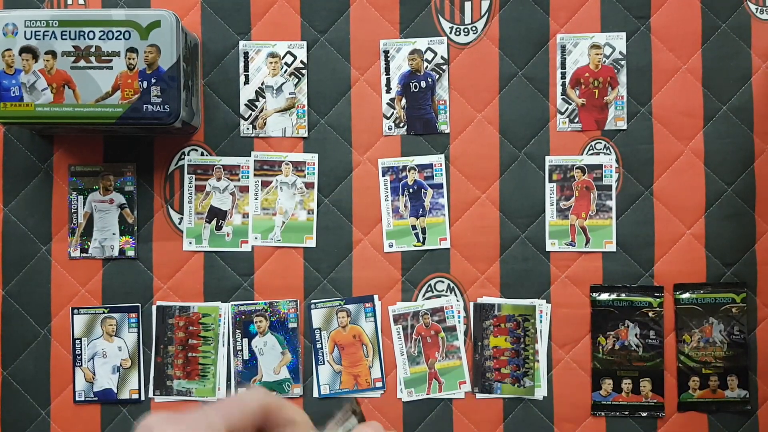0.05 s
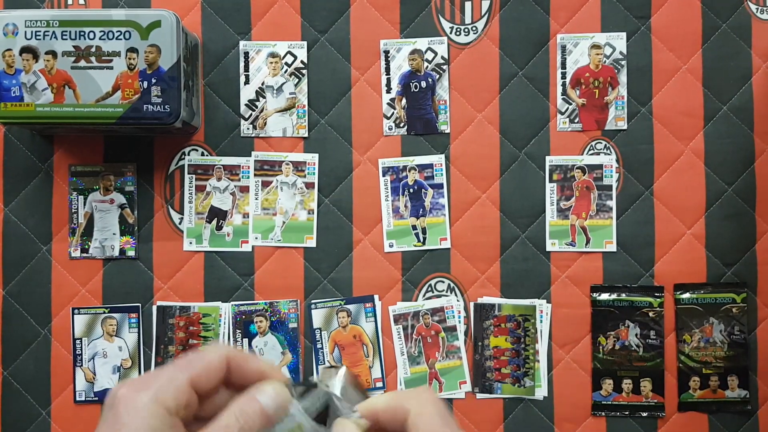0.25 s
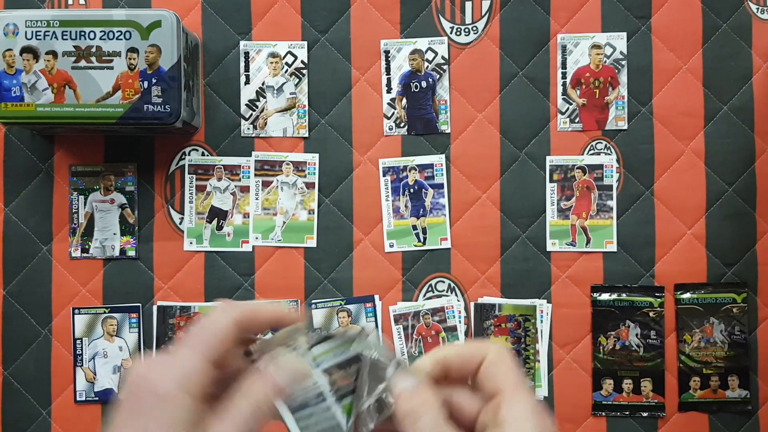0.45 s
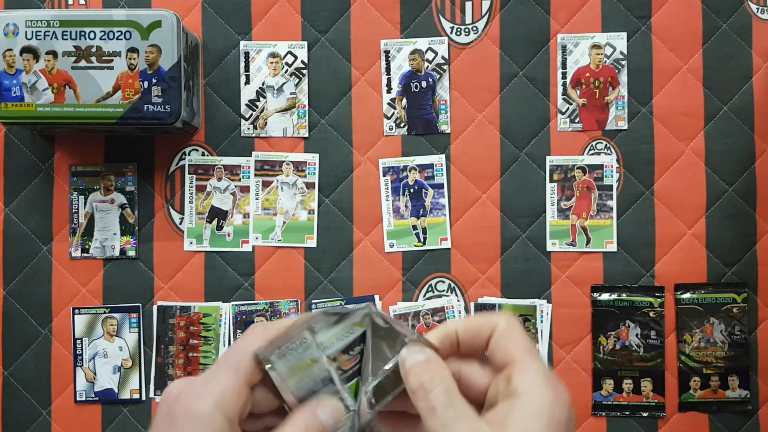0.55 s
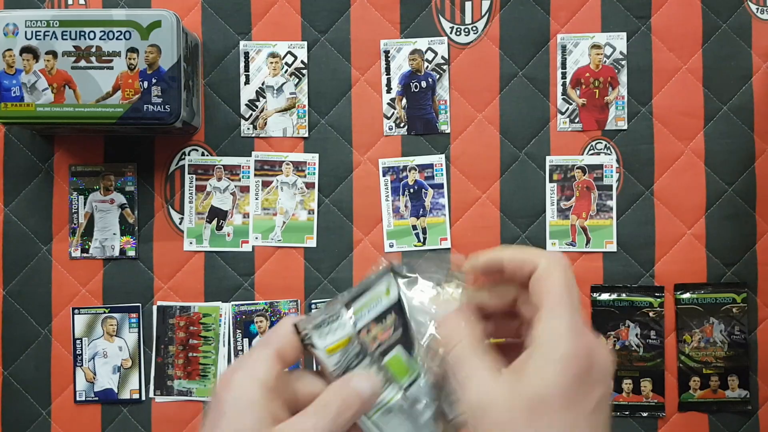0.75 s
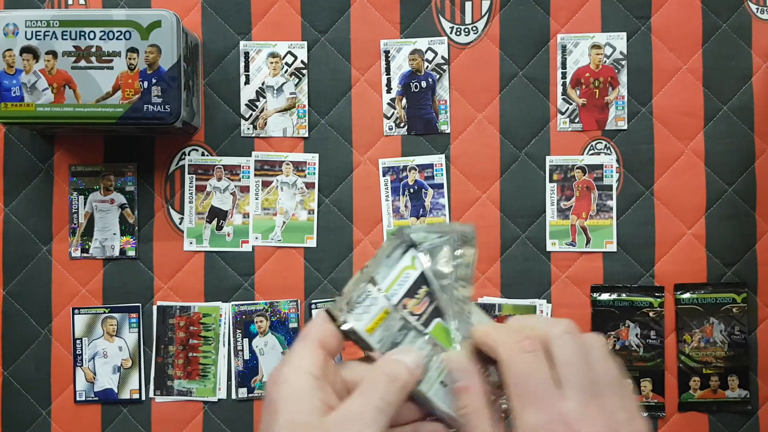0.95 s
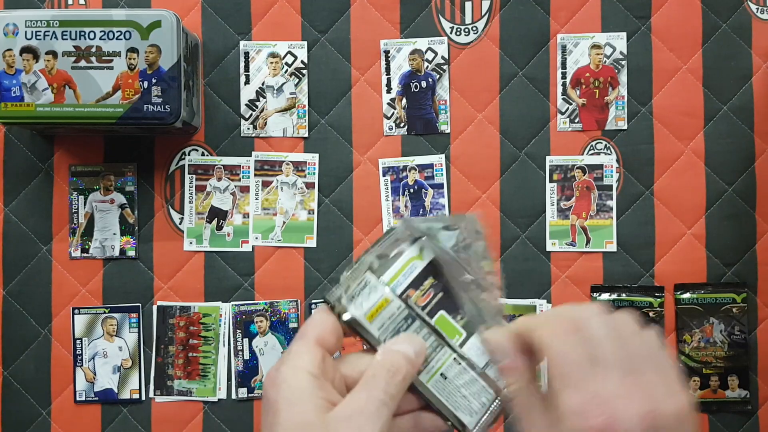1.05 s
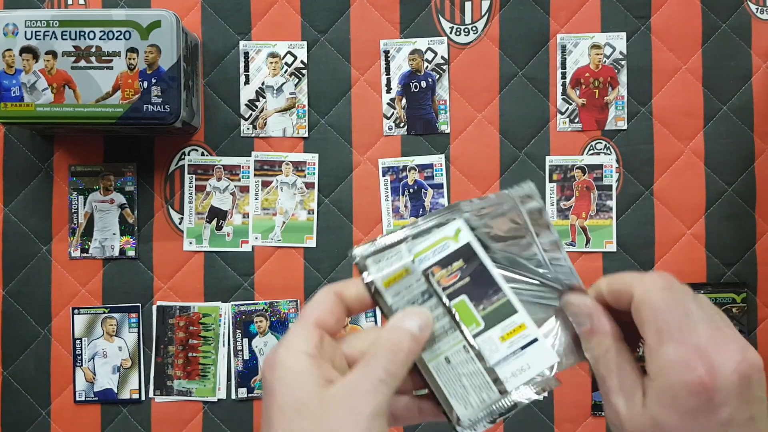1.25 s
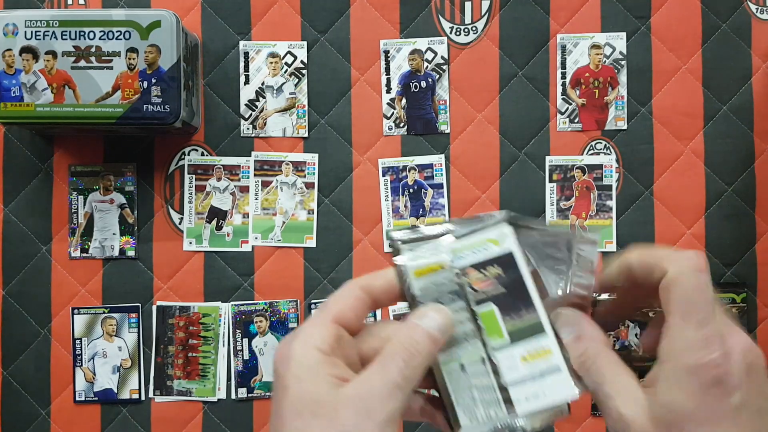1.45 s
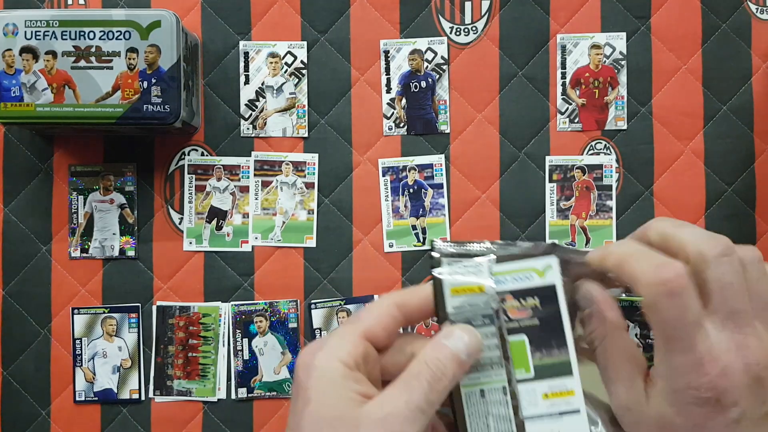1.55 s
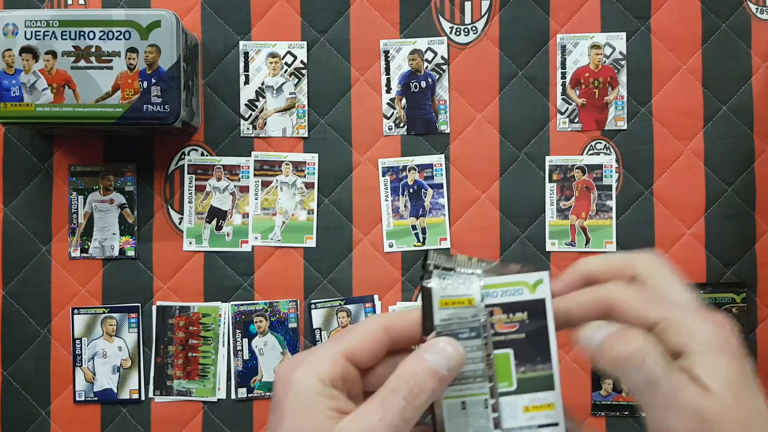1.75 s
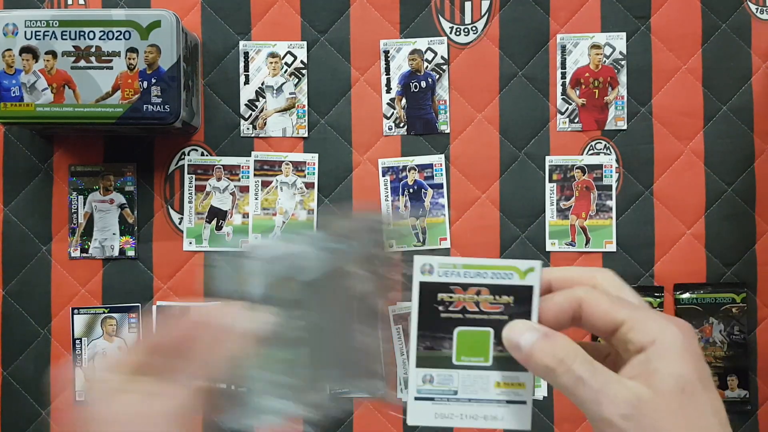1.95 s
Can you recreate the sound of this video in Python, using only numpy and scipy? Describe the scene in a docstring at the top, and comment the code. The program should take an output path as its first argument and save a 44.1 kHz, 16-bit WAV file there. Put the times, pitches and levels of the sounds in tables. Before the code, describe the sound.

A plastic foil packet crinkles faintly in the hands, close by in a small room. At about 0.2 seconds its seam gives with a bright snap on the left and a short rip. Uneven crinkles and sharp little pops follow as it is peeled open, loudest from 1.2 to 1.6 seconds, with a few soft thumps of the flexing wrapper. The crackling thins out toward 2 seconds.

```python
"""A faint crinkle, then one bright snap and a short rip: two hands tear open a plastic foil packet, close
by in a small room, and peel it off the cards. Each pull crinkles the foil in a shower of tiny creases.
Single creases pop over with a crack, a papery knock and a low flap, and now and then the whole sheet
bows with a soft thump. The room rings on after them, over a faint rumble and hiss."""
import sys
import numpy as np
from scipy import signal
from scipy.io import wavfile
from scipy.ndimage import uniform_filter1d

SR = 44100
rng = np.random.default_rng(int(sys.argv[2]) if len(sys.argv) > 2 else 0)


def dump(signal):
    """Clip the signal to [-1, 1] and save it as 16-bit WAV at the path in sys.argv[1]."""
    limited = np.clip(np.atleast_2d(signal).T, -1, 1)
    pcm = np.round(limited * 32767).astype(np.int16)
    wavfile.write(sys.argv[1], SR, pcm)


N = 88200
TIME = np.arange(N) / SR

# Single creases popping over. Each row: start in seconds, flap, knock and crack levels in dB before
# the voice's trim, knock pitch in Hz, crack pitch in Hz.
POPS = [(.0574, -67, -53, -40.5, 2020, 9100), (.167, -63, -70, -49, 2000, 9200),
        (0.179, -60, -41, -45, 2640, 7060), (0.1993, -77, -33.5, -32, 2650, 4050),
        (0.2207, -49.5, -51, -27.5, 1177, 10500), (0.2259, -61, -41, -33, 2430, 4460),
        (0.2686, -53, -38, -40, 1110, 6500), (0.3792, -51, -43.5, -44, 2500, 7940),
        (0.4036, -70, -60, -41.5, 2400, 7850), (0.446, -61, -36, -38.5, 2620, 7100),
        (.4673, -53, -47, -48, 2200, 4950), (0.4826, -56, -39, -53, 2000, 5000),
        (.5037, -47, -52, -34, 2000, 9900), (0.525, -47, -36.5, -37, 1500, 12000),
        (0.571, -56, -45.5, -36.5, 2600, 4640), (.6105, -45, -37.5, -43.5, 1320, 4370),
        (0.6363, -70, -45.5, -45.5, 1500, 5500), (.6863, -37.5, -43.5, -34, 1590, 11500),
        (0.7177, -47, -46.5, -33.5, 1800, 12700), (.726, -61, -51, -32.5, 1600, 10900),
        (.743, -46.5, -46, -71, 1470, 5000), (0.7577, -51, -46, -31.5, 2500, 10000),
        (0.7645, -61, -38, -29.5, 2060, 6450), (0.7835, -50, -38, -30, 2000, 12500),
        (0.7882, -57, -42, -33, 2400, 6060), (.8, -51, -34, -32.5, 850, 8100),
        (0.9048, -50, -42.5, -40.5, 2550, 6300), (.9795, -66, -56, -50.5, 2000, 10900),
        (1.0132, -42, -41, -40.5, 2220, 7500), (1.022, -42.5, -43.5, -61, 1600, 4500),
        (1.0448, -58, -39.5, -39.5, 1800, 7200), (1.083, -48.5, -51, -45, 1490, 7000),
        (1.1156, -56, -40, -40, 1600, 12000), (1.1363, -71, -48, -30.5, 2000, 9000),
        (1.167, -65, -36.5, -50, 1680, 5000), (1.176, -41, -36.5, -46, 1260, 6000),
        (1.1896, -60, -41, -31.5, 2800, 6040), (1.2431, -37.5, -26.5, -39, 2120, 7050),
        (1.2518, -44, -40, -30, 2500, 12000), (1.2626, -29.5, -27.5, -31.5, 1600, 7900),
        (1.275, -37, -29, -46, 1880, 4530), (1.2859, -44, -42, -27, 1900, 9900),
        (1.2908, -30, -20, -30, 1680, 11000), (1.3017, -39, -22.5, -31, 1800, 4770),
        (1.3356, -26.5, -26, -31, 1430, 4950), (1.3398, -37, -31, -40, 1460, 4470),
        (1.4127, -43, -32.5, -33.5, 1090, 8400), (1.4286, -48, -38, -43, 1780, 4570),
        (1.4363, -41, -36, -38.5, 1010, 5000), (1.531, -32, -27.5, -33, 2380, 6660),
        (1.5415, -42, -33, -44, 2500, 5960), (1.5536, -56, -36.5, -39.5, 2200, 6400),
        (1.5819, -44.5, -43, -44, 1900, 7000), (1.5993, -39, -31.5, -42.5, 2150, 5460),
        (1.7132, -53, -37, -49, 1980, 4560), (1.7592, -61, -44, -45.5, 2500, 11000),
        (1.741, -53.5, -63, -48, 2010, 7960), (1.899, -60, -53.5, -66, 2090, 4500),
        (1.978, -53.5, -38.5, -41.5, 1920, 7900), (1.9927, -53, -45, -47, 1680, 5000)]
# Pulls of the hands. Each row: start and length in seconds, flap, knock and crack levels in dB before trim.
PULLS = [(0.014, 0.061, -64, -57, -59), (0.164, 0.025, -72, -59, -49), (0.364, 0.067, -66, -49.5, -51.5),
         (0.459, 0.086, -58.5, -43.5, -42), (0.512, 0.069, -53.5, -40, -48.5),
         (0.602, 0.14, -52.5, -46.5, -53), (0.746, 0.07, -46, -38.5, -44), (0.825, 0.079, -50, -44, -49.5),
         (0.999, 0.1, -52, -46.5, -50.5), (1.111, 0.11, -55, -42, -45), (1.239, 0.103, -40.5, -33.5, -41),
         (1.408, 0.061, -47.5, -45, -51.5), (1.522, 0.088, -51.5, -46.5, -49),
         (1.629, 0.18, -60.5, -53, -59.5), (1.894, 0.13, -59, -56.5, -64.5)]
# The foil's voices: low flap, papery knock, bright crack. Each row: frequency in Hz, relative level in dB.
FLAP_EQ = [(20, -33), (60, -19.5), (130, -12), (230, -1.5), (320, 2), (470, 1.5), (620, -12.5), (850, -4.5),
           (1300, -32), (4000, -60)]
KNOCK_EQ = [(100, -36.5), (400, -15), (620, -10), (850, 0.5), (1150, -4), (1650, -1), (2300, 0.5),
            (2900, -1), (3600, -12), (9000, -25), (17000, -69)]
CRACK_EQ = [(200, -43), (1500, -4.5), (3000, 1.5), (4500, 2), (7500, 2), (8800, -4.5), (12000, 0),
            (16000, -6)]
# Flap, knock and crack in turn. Each row: chatter decay in seconds, click gain over the chatter,
# pop trim in dB, pull trim in dB, left-right likeness, pan to the left in dB.
VOICES = [(0.0026, 0.65, -1.5, -4, 0.85, 0), (0.00098, 0.72, 1, -3, 0.79, 1.5),
          (0.0013, 0.43, -0.5, 1.5, 0.59, 8)]
FLAP_HZ, PULL_SWELL_DB = 366, 2.5
PULL_ATTACK_S, PULL_RELEASE_S = 0.0094, 0.0064
POP_LEAD_S, RIGHT_LAG_S = 0.002, 0.00019
POP_GAIN = np.sqrt(0.005 * SR)  # gives a pop the energy of 5 ms at unit power

def foil():
    """Showers of tiny creases and single pops excite the flap, knock and crack of the sheet."""
    out = np.zeros((2, N))
    wobble = np.sqrt(N) * unit(uniform_filter1d(rng.standard_normal(N), size=400))
    swell = amp(PULL_SWELL_DB * wobble)
    for k, eq in enumerate([FLAP_EQ, KNOCK_EQ, CRACK_EQ]):
        chatter_s, click, pop_trim_db, pull_trim_db, likeness, pan_db = VOICES[k]
        effort = np.zeros(N)
        for start, length, *levels_db in PULLS:
            attack = np.clip((TIME - start) / PULL_ATTACK_S, 0, 1)
            release = np.exp(-np.maximum(TIME - start - length, 0) / PULL_RELEASE_S)
            effort = np.maximum(effort, amp(levels_db[k] + pull_trim_db) * attack * release)
        clicks = effort * swell * shower(rate_per_s=1100, spread_db=3.5)
        voice = crinkle(clicks, eq, chatter_s, click, likeness)
        for start, *levels_db, knock_hz, crack_hz in POPS:
            pitch_hz = (FLAP_HZ, knock_hz, crack_hz)[k]
            pop = unit(colour(snap(chatter_s, click, likeness), crease_eq(eq, pitch_hz)))
            add(voice, start - POP_LEAD_S, amp(levels_db[k] + pop_trim_db) * POP_GAIN * pop)
        out += pan(pan_db) * voice
    return out

def snap(chatter_s, click, likeness, rise_s=0.00066, lag_scatter_s=0.00006, size=700):
    """A crease stirs, clicks over and chatters briefly; the right side hears it a touch later."""
    t = TIME[:size] - POP_LEAD_S
    chatter = rng.standard_normal((2, size)) * np.sqrt(rng.exponential(1, size))
    envelope = np.exp(-np.maximum(t / chatter_s, -t / rise_s))
    burst = unit(stereo(chatter, likeness) * envelope)
    burst[:, round(POP_LEAD_S * SR)] += click
    lag = max(round((RIGHT_LAG_S + lag_scatter_s * rng.standard_normal()) * SR), 0)
    burst[1] = np.pad(burst[1], (lag, 0))[:size]
    return unit(burst) * POP_GAIN

def shower(rate_per_s, spread_db):
    """Random clicks of very unequal strength, levelled to a mean power near one."""
    hits = rng.random(N) < rate_per_s / SR
    strength = amp(spread_db * np.minimum(rng.exponential(1, N), 4))
    clicks = hits * strength * rng.choice([-1., 1.], N)
    power = abs(uniform_filter1d(clicks ** 2, size=1500))
    return clicks / np.sqrt(power + 1e-4)

def crinkle(clicks, eq, chatter_s, click, likeness, count=10):
    """Each click triggers one of several creases, from large and dull to small and bright."""
    which, out = rng.integers(0, count, N), np.zeros((2, N))
    for k, hz in enumerate(np.geomspace(eq[2][0], eq[-2][0], count)):
        crease = unit(colour(snap(chatter_s, click, likeness), crease_eq(eq, hz)))
        out += signal.oaconvolve((clicks * (which == k))[None], crease)[:, :N]
    return out

def crease_eq(eq, pitch_hz, peak_db=7.5, width_octaves=0.57):
    """A crease's size puts a peak of its own on the foil's voice."""
    hz = np.geomspace(20, SR / 2, 120)
    bell = np.exp(-(np.log2(hz / pitch_hz) / width_octaves) ** 2)
    return np.transpose([hz, curve(eq, hz) + peak_db * bell])

# The tone of the seam's snap. Each row: frequency in Hz, relative level in dB.
SEAM_EQ = [(30, -18), (130, -1), (400, -4), (1100, -1), (2000, -22), (5000, -4), (7500, -7), (10000, 4.5),
           (16000, -1.5)]
SEAM_AT_S = 0.2119

def seam_snap():
    """The seam gives with one bright snap, hard left."""
    crack = np.zeros((2, N))
    add(crack, SEAM_AT_S - POP_LEAD_S, amp(-21) * snap(chatter_s=0.0002, click=4.0, likeness=0.6))
    return pan(left_db=30) * colour(crack, SEAM_EQ)

# The rasp of the rip. Each row: frequency in Hz, relative level in dB.
RIP_EQ = [(60, -35), (300, -6), (600, -6), (1000, -2), (2500, 4.5), (5000, 3), (7500, 4), (9000, -0.5),
          (16000, -9)]

def rip(hold_s=0.0079, decay_s=0.047):
    """The rip runs on from the snap as a dense, dying train of tiny breaks."""
    envelope = (TIME > SEAM_AT_S) * np.exp(-np.maximum(TIME - SEAM_AT_S - hold_s, 0) / decay_s)
    breaks = amp(-30.5) * envelope * shower(rate_per_s=1300, spread_db=4)
    return pan(left_db=2) * crinkle(breaks, RIP_EQ, chatter_s=0.00098, click=0.16, likeness=0.12)

# Soft thumps of the whole sheet. Each row: start in seconds, opening pitch in Hz, level in dB.
BOWS = [(.609, 450, -36.5), (1.02, 302, -40.5), (1.079, 272, -45), (1.262, 122, -60), (1.335, 130, -50.5),
        (1.337, 380, -34.5), (1.414, 390, -27), (1.438, 320, -36.5), (1.454, 252, -43), (1.467, 181, -44),
        (1.599, 111, -53.5)]

def sheet_bows(rise_cycles=0.5, sag_per_s=11.3):
    """The slack sheet bows and swings for a few cycles, its pitch sagging."""
    out, t = np.zeros((2, N)), TIME[:SR // 20]
    for start, hz, db in BOWS:
        cycles = np.cumsum(hz * np.exp(-sag_per_s * t)) / SR
        envelope = cycles / rise_cycles * np.exp(1 - cycles / rise_cycles)
        add(out, start, amp(db) * (envelope * np.sin(2 * np.pi * cycles))[None])
    return out

# The length of the reverb tail. Each row: frequency in Hz, seconds to fall 60 dB.
TAIL_T60 = [(250, 0.19), (700, 0.49), (1800, 0.3), (5000, 0.3), (9000, 0.34), (16000, 0.28)]
# The tone of the tail. Each row: frequency in Hz, relative level in dB.
TAIL_EQ = [(50, -10), (200, 0), (400, 5), (1000, 1.5), (3000, 4.5), (7500, 3.5), (9000, -8.5), (16000, 6.5)]
# Centred lows, wide highs. Each row: frequency in Hz, left-right likeness from 0 to 1.
TAIL_LIKENESS = [(100, 0.81), (300, 1), (700, 0.7), (1400, 0), (3000, 0)]
# Early reflections. Each row: delay in seconds, gain.
ECHOES = [(.0022, 0.057), (.0076, 0.069), (0.014, 0.05)]
# Narrow resonances of the surroundings. Each row: pitch in Hz, gain in dB, seconds to fall 60 dB.
RESONANCES = [(302, -10, 0.14), (373.3, -8, 0.14), (416, -4, 0.54), (940, -3.5, 0.17), (1431, -2.5, 0.083),
              (1542, 0.5, 0.13), (1592, 0, 0.11), (2130, -3, 0.11)]

def room_response(tail_db=-8.5, fade_in_s=0.0014):
    """The room answers a click with a diffuse tail, early echoes and a few ringing notes."""
    t = TIME[:SR // 2]
    hz, when, bands = signal.stft(rng.standard_normal((2, len(t))), SR, nperseg=256)
    hz = hz[:, None]
    decay = amp(curve(TAIL_EQ, hz) - 60 * when / curve(TAIL_T60, hz))
    bands = stereo(bands, curve(TAIL_LIKENESS, hz)) * decay
    tail = signal.istft(bands, SR, nperseg=256)[1][:, :len(t)]
    response = amp(tail_db) * unit(tail * np.clip(t / fade_in_s - 0.5, 0, 1))
    for delay_s, gain in ECHOES:
        response[[0, 1], round(delay_s * SR) + rng.integers(0, 20, 2)] += gain
    stereo_t = t - np.array([[0], [RIGHT_LAG_S]])
    for ring_hz, db, t60 in RESONANCES:
        damping = np.log(1000) / t60
        ring = np.exp(-damping * t) * np.cos(2 * np.pi * ring_hz * stereo_t)
        response += amp(db) * 2 * damping / SR * ring
    return response

def room(send, cycle_hz=2.478, count=4):
    """The moving packet stirs one echo pattern after another, crossfading in a loop."""
    place = TIME * cycle_hz * count
    out = np.zeros((2, N))
    for k in range(count):
        distance = abs((place - k) % count - count / 2)
        fade = np.cos(np.pi / 2 * np.minimum(distance, 1))
        out += signal.fftconvolve(send[:1] * fade, room_response(), axes=1)[:, :N]
    return out

# The bed of room tone. Each row: frequency in Hz, relative level in dB.
ROOM_TONE_EQ = [(20, -9.5), (55, -1.5), (120, -1), (300, -4.5), (600, -13), (2000, -9.5), (6000, -16),
                (16000, -32)]

def room_tone():
    """Faint steady rumble and hiss."""
    return amp(-61) * colour(stereo(rng.standard_normal((2, N)), likeness=0.53), ROOM_TONE_EQ)

def amp(db):
    """Decibels to gain."""
    return 10 ** (np.asarray(db) / 20)

def curve(points, hz):
    """Reads a table along a logarithmic frequency axis."""
    points_hz, values = np.transpose(points)
    return np.interp(np.log(hz + 1), np.log(points_hz + 1), values)

def unit(x):
    """Scales each channel to energy one."""
    return x / np.sqrt(np.sum(x ** 2, -1, keepdims=True) + 1e-20)

def add(mix, start_s, sound):
    """Drops a sound into the mix."""
    part = mix[:, max(round(start_s * SR), 0):][:, :sound.shape[1]]
    part += sound[:, :part.shape[1]]

def colour(x, eq, size=4096):
    """Minimum-phase EQ: it rings only after each click."""
    log_gain = np.log(amp(curve(eq, abs(np.fft.fftfreq(size, 1 / SR)))))
    ring = np.fft.ifft(np.exp(np.conj(signal.hilbert(log_gain)))).real[:size // 2]
    return signal.oaconvolve(x, unit(ring)[None])[:, :N]

def pan(left_db):
    """Constant-power gains, the left side left_db above the right."""
    return np.sqrt(2) * unit(amp([left_db / 2, -left_db / 2]))[:, None]

def stereo(noise, likeness):
    """Blends two noises into a pair: likeness 0 is wide, 1 is mono."""
    likeness = np.clip(likeness, -1, 1)
    return np.array([noise[0], likeness * noise[0] + np.sqrt(1 - likeness ** 2) * noise[1]])

def scene():
    """The packet up close, with the room behind it."""
    packet = foil() + sheet_bows() + rip()
    seam = seam_snap()
    send = packet + amp(-6) * seam  # the snap points at the listener, so it stirs the room less
    return packet + seam + pan(left_db=-0.2) * room(send) + room_tone()

def record(dry, cutoff_hz=16500):
    """A steep low-pass takes off the very top."""
    lowpass = signal.firwin(255, cutoff_hz, window=("kaiser", 9), fs=SR)
    return signal.oaconvolve(dry, lowpass[None], "same")

dry = scene()
out = record(dry)
dump(out)
```